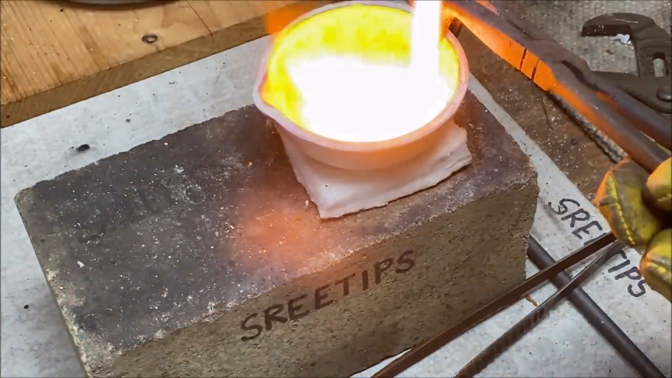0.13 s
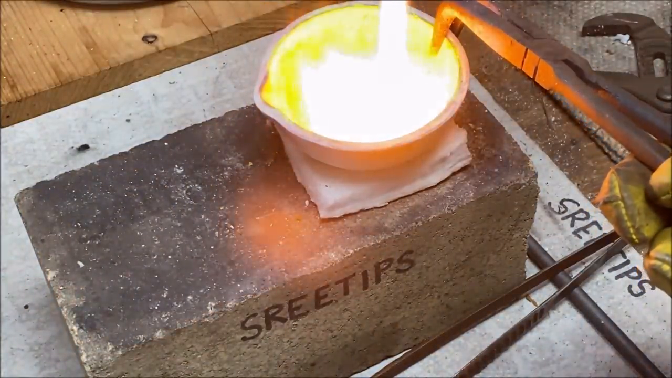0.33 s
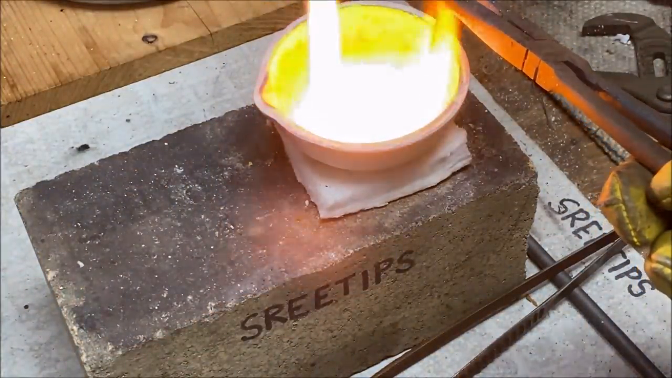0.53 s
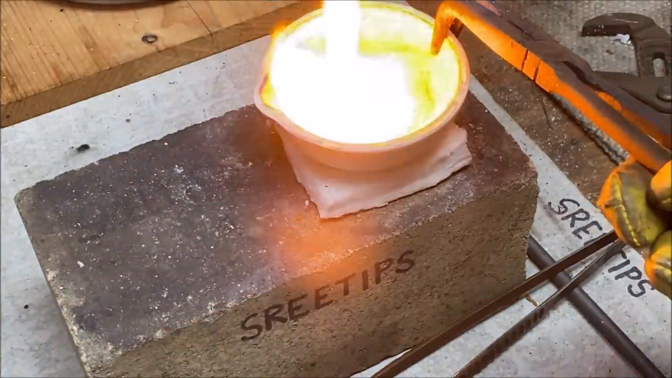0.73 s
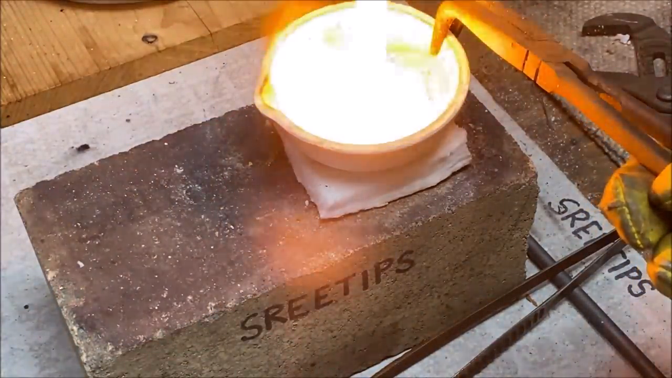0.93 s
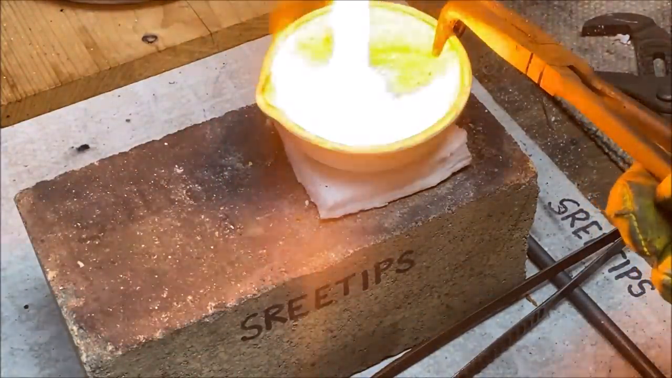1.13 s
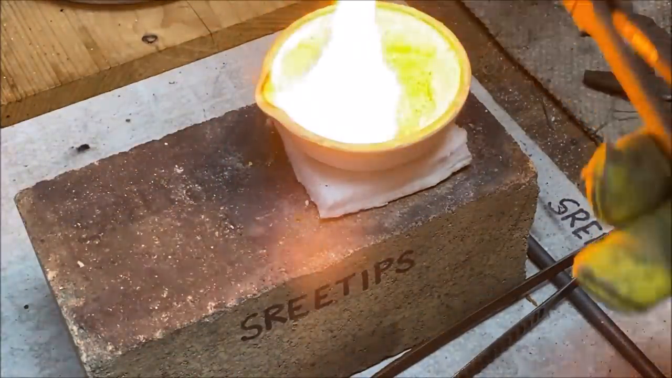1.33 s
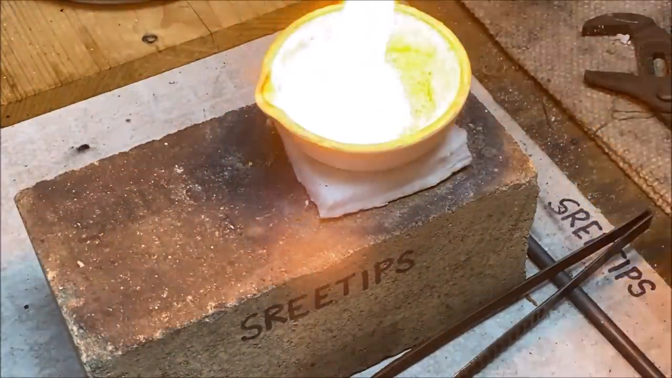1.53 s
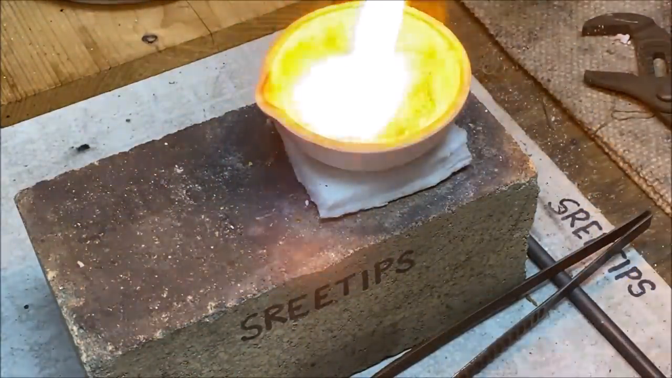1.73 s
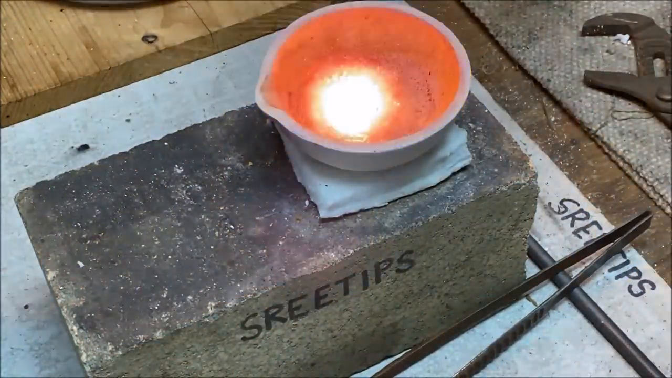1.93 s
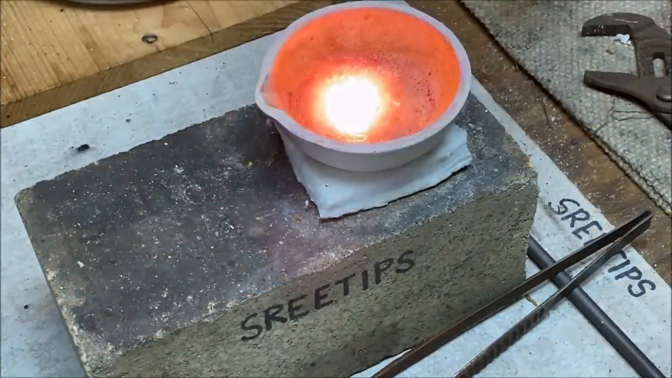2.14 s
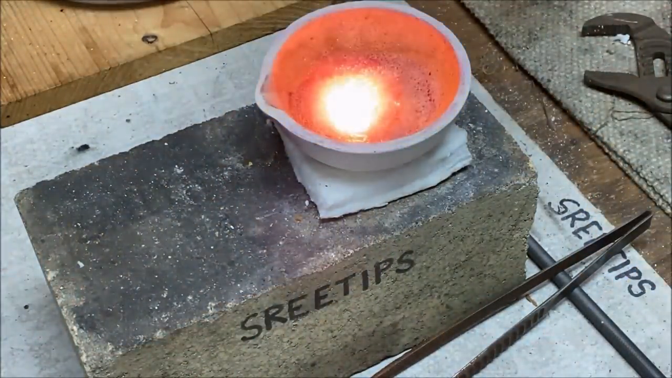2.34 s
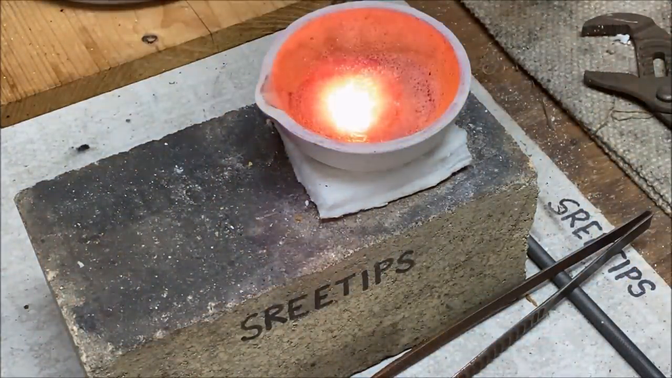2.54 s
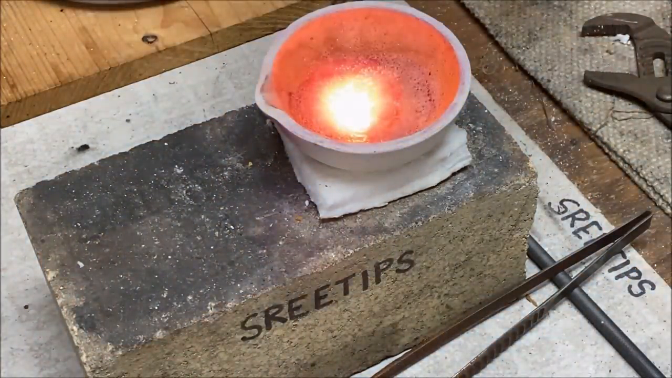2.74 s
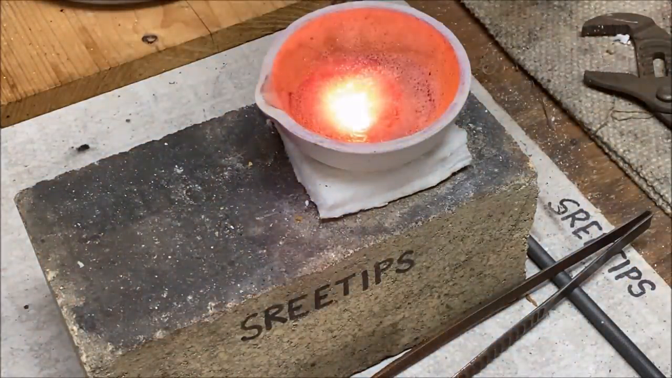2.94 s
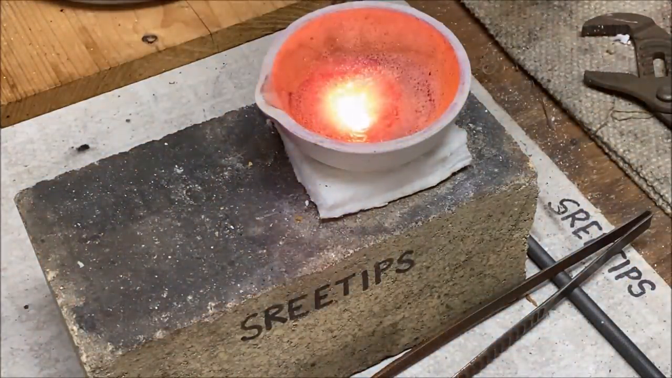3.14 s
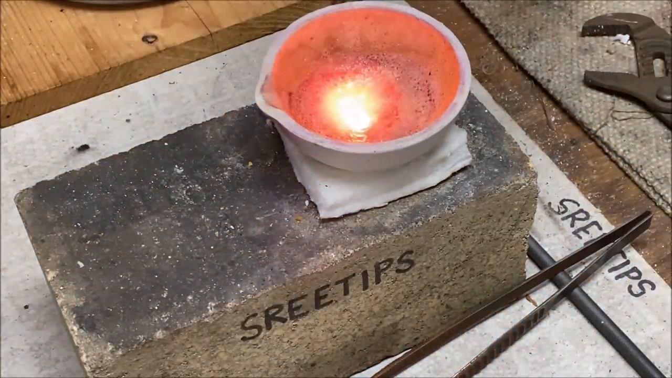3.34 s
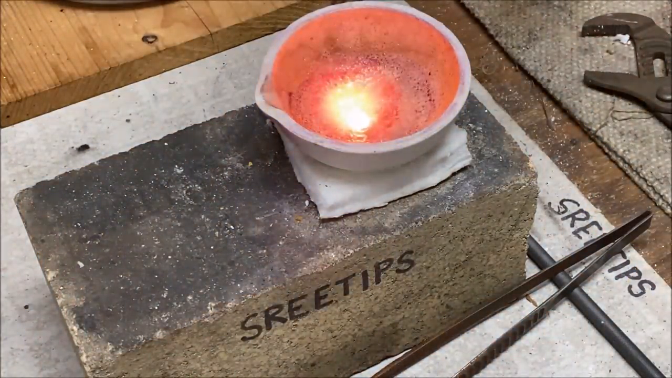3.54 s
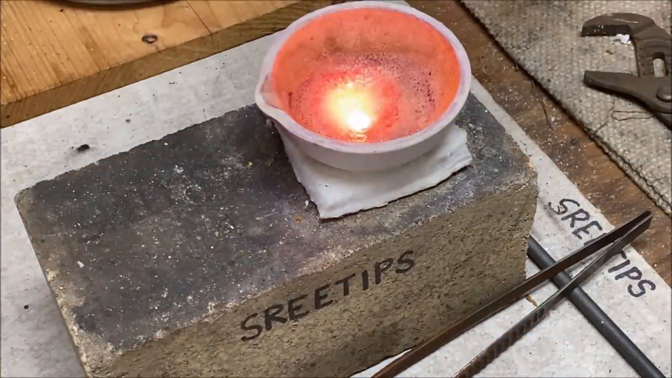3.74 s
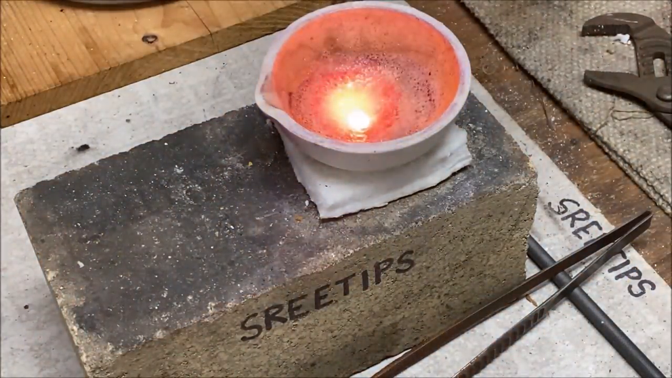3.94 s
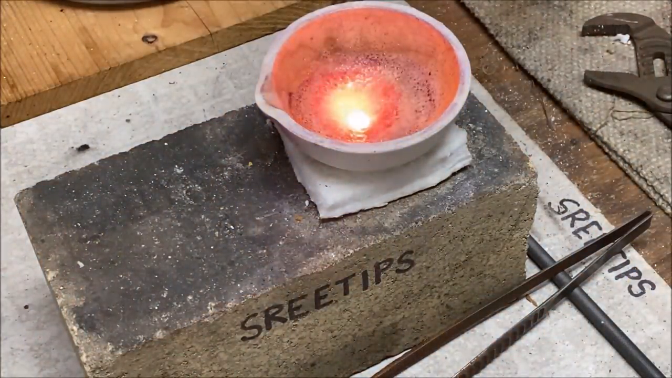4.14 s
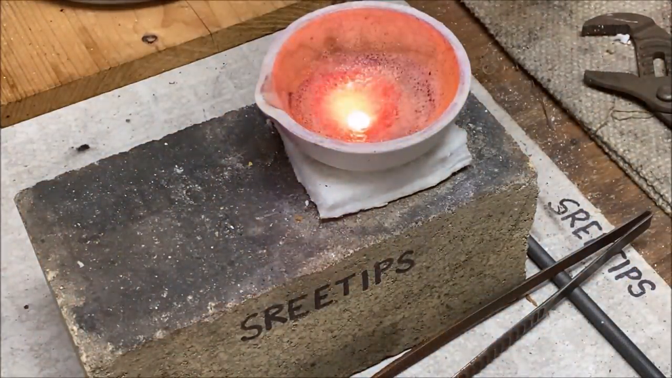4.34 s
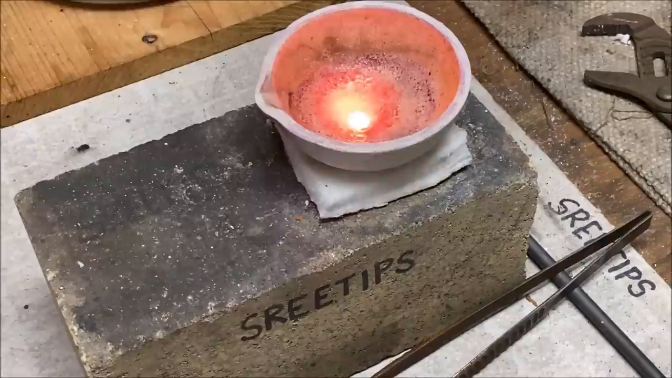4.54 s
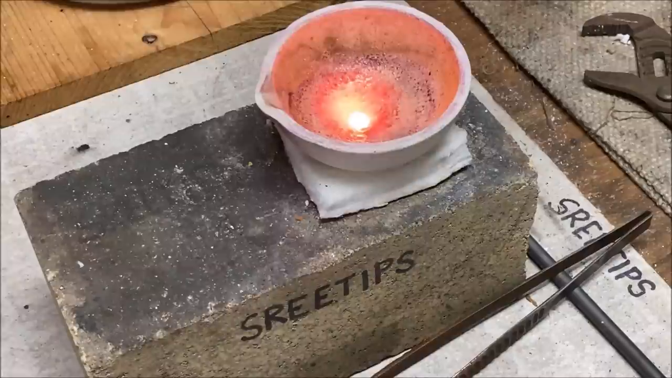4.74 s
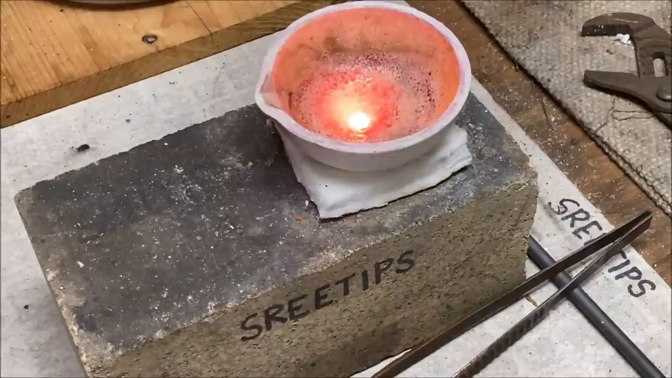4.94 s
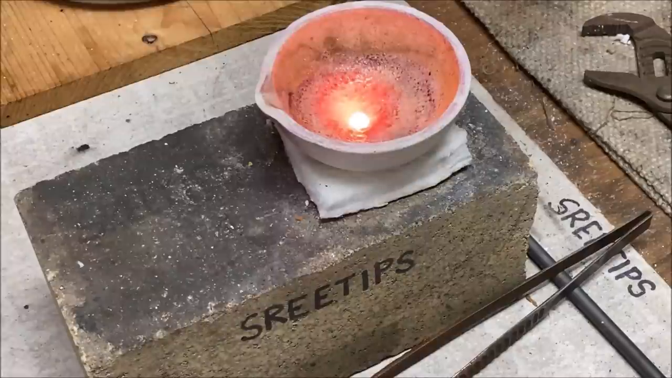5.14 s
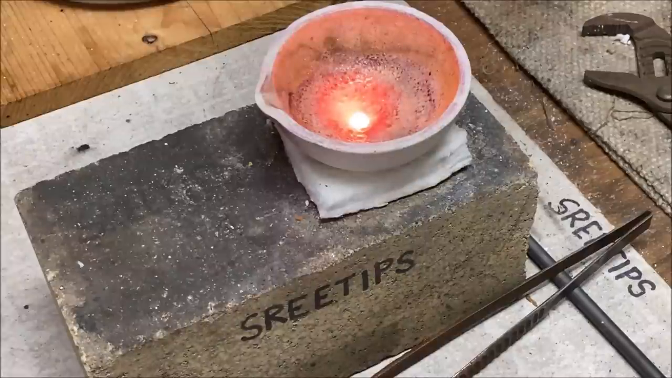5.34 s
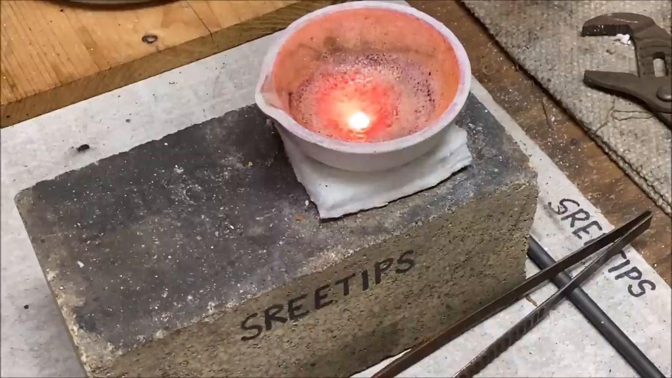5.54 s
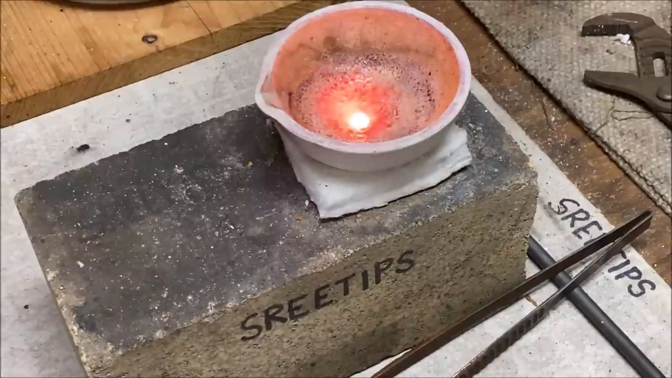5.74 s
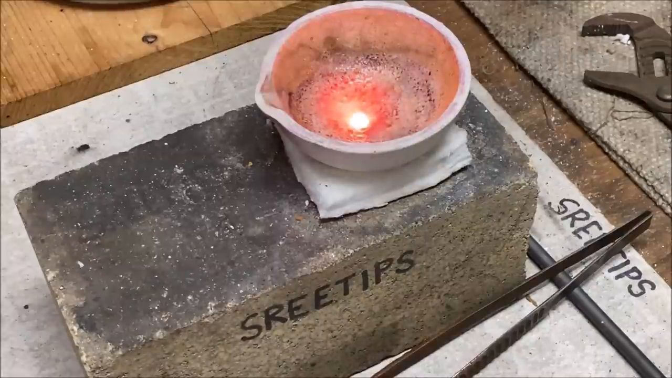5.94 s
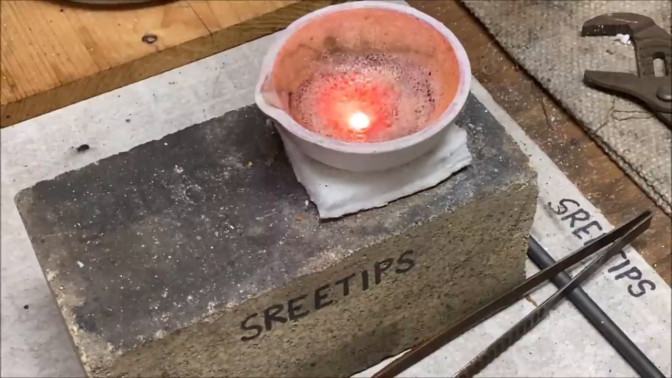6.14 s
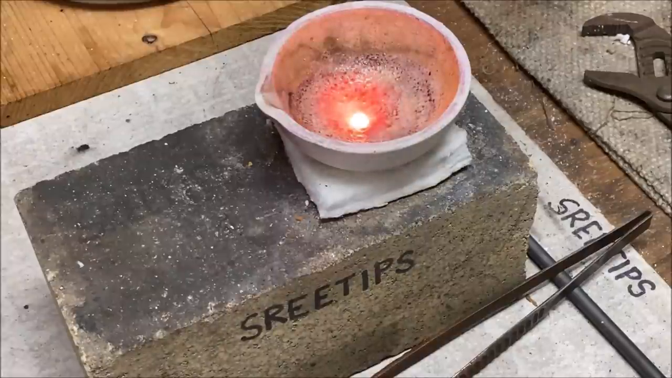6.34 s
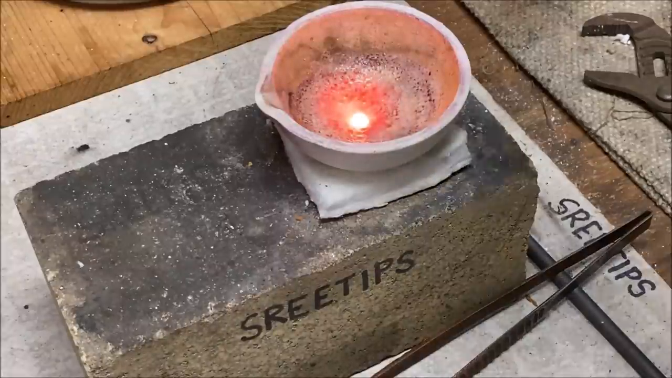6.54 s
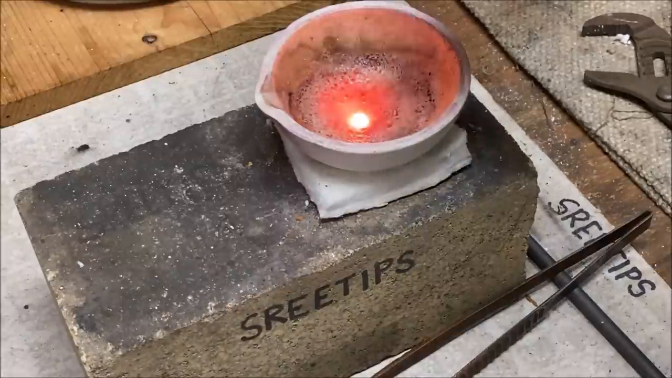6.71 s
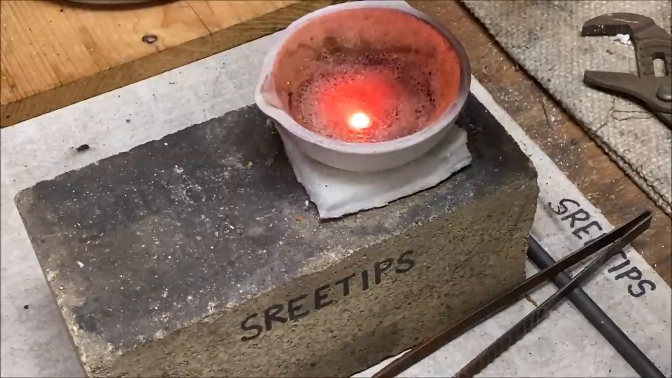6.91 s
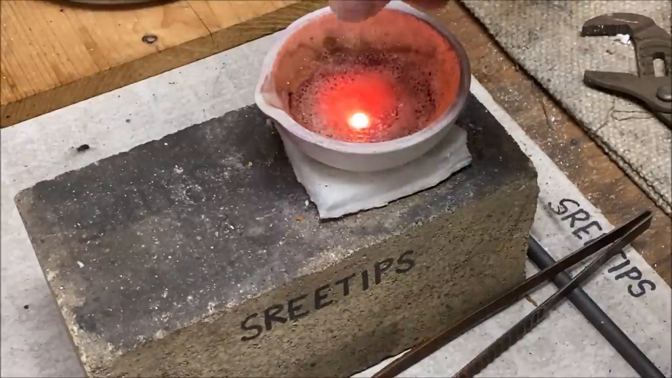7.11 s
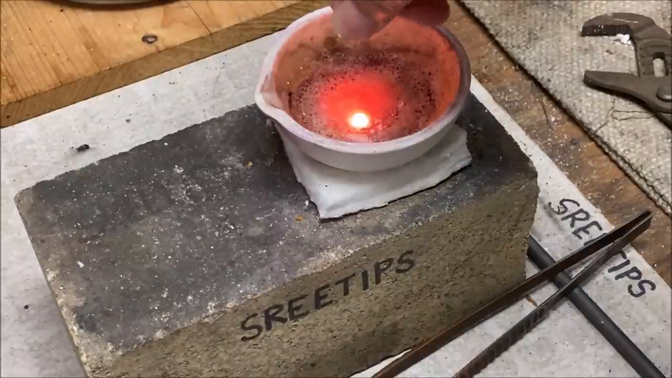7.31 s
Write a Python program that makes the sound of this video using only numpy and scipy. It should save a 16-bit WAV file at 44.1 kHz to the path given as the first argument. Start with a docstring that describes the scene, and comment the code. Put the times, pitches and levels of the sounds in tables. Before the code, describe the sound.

Steady workshop fan drone, with a sharp click and bench thud as a faint torch hiss ends, then cloth rustle and microphone bumps.

```python
"""A workshop extractor fan runs throughout: motor whine and hum over moving air and a low room boom.
At first a small torch hisses faintly into a glowing dish. Near 1.6 s it is lifted and its valve squeaks;
a click and a thud on the bench follow, and the flame is out by 2.05 s. While the dish cools, cloth and
hands rustle, tick and bump close to the hand-held microphone, whose moves shift the whine's level."""
import sys
import numpy as np
from scipy import signal
from scipy.fft import rfft, irfft
from scipy.io import wavfile

SR = 44100
rng = np.random.default_rng(int(sys.argv[2]) if len(sys.argv) > 2 else 0)


def file_out(sig):
    """Save sig as 16-bit WAV at sys.argv[1]."""
    # one column per channel
    cols = np.atleast_2d(sig).T
    # limit, then scale
    lim = np.clip(cols, -1, 1)
    pcm = np.round(lim * 32767).astype(np.int16)
    wavfile.write(sys.argv[1], SR, pcm)


N = 325017

# Fan air spectrum. Each row: frequency in Hz, relative density in dB.
AIR_SPECTRUM = [(15, -32.5), (25, -10), (80, -7.5), (126, -10), (193, -10), (350, -10.5), (540, -16.5),
                (700, -15), (900, -20), (1140, -27.5), (1760, -30), (3300, -50), (8100, -62.5),
                (15900, -81.5)]
# Duct resonances. Each row: centre in Hz, width in Hz, level in dB.
DUCT_MODES = [(249, 8.6, -56), (318, 40, -59.5), (197, 22, -61), (1360, 140, -70)]
# Room boom. Each row: time in seconds, level in dB.
BOOM_LEVEL = [(0.0, -44), (0.18, -58), (0.3, -44.5), (1.0, -51.5), (1.23, -39.5), (1.55, -48.5),
              (1.72, -40.5), (1.95, -45), (2.28, -37), (2.54, -50), (3.5, -41), (3.65, -49), (5.3, -43),
              (6.14, -52.5), (6.27, -42), (6.46, -53.5), (7.28, -38.5), (7.37, -45)]
# Whine at the microphone. Each row: time in seconds, level in dB.
WHINE_LEVEL = [(0.0, -36), (0.5, -41), (0.8, -43), (1.25, -39), (1.6, -41), (1.9, -38), (2.22, -38.5),
               (2.54, -50.5), (2.85, -44), (3.26, -53), (3.37, -39.5), (3.57, -32.5), (3.78, -35),
               (4.06, -33), (4.6, -34.5), (5.05, -33.5), (5.5, -39), (6.5, -35), (7.37, -35)]
# Whine pitch, bent as the microphone moves. Each row: time in seconds, pitch in Hz.
WHINE_PITCH = [(0.0, 619.3), (.5, 619.6), (.7, 618.9), (1.2, 619.6), (1.7, 618.7), (1.9, 619.4),
               (2.3, 618.9), (2.5, 619.6), (2.9, 617.8), (3.3, 619.7), (4.05, 620.1), (4.65, 618.3),
               (5.05, 619.6), (5.4, 617.7), (5.7, 617.9), (6.5, 619.8), (6.8, 619.6), (7.37, 618.2)]
# Steady motor lines. Each row: shaft order, multiple of twice mains.
STEADY_ORDERS = [(0, 1), (0, 2), (0, 3), (0, 4), (-1, 1), (1, 1), (20, 0), (24, 0), (23, 1)]
# Mean level of each steady line in dB.
STEADY_LEVELS_DB = [-48.5, -59.5, -56.5, -64, -57, -54, -69.5, -67.5, -65.5]
# Side lines that shift with the microphone. Each row: shaft order, multiple of twice mains.
SIDE_ORDERS = [(21, 0), (22, 1), (23, 0), (21, 1), (0, 5), (22, 3)]
# Each row: time in seconds, then the level of each side line in dB.
SIDE_LEVELS = [(0.0, -48, -60, -63, -56, -54, -64), (0.75, -48, -66, -63, -56.5, -62, -63.5),
               (1.44, -48, -60.5, -60, -60, -62, -63.5), (1.9, -48, -55, -56, -60, -58, -67),
               (2.3, -50.5, -55.5, -58, -58, -56, -67), (2.9, -52, -57, -55, -59, -62, -73),
               (3.25, -51, -55, -56, -57, -57, -68), (3.5, -51, -50, -56, -61, -54, -65),
               (3.8, -55, -53.5, -60, -61, -55, -66.5), (4.3, -59.5, -50.5, -59, -55.5, -58, -65.5),
               (4.9, -59, -52, -52, -57.5, -54.5, -64), (5.5, -55, -56, -57, -61, -52, -65),
               (6.36, -66, -50, -59, -59.5, -54, -68), (7.37, -62.5, -53.5, -55.5, -62, -54.5, -66)]
# Line one shaft order above the whine. Each row: time in seconds, phase lead in radians.
UPPER_LEAD = [(0, 0), (2.1, 0), (2.6, -1.8), (3.3, -1.6), (3.9, 2.4), (7.37, 2.3)]
# Torch hiss. Each row: centre in Hz, width in Hz, level in dB, change in dB when deep in the dish,
# change in dB when lifted.
FLAME_BANDS = [(4060, 650, -89, 1, 13), (4980, 800, -88, 0, 13), (6770, 500, -88, 0.5, -3),
               (9400, 800, -92, 5, -1), (10000, 250, -89, -7, 2), (11000, 800, -91, -2, -3),
               (11950, 400, -93.5, -5, 0), (12750, 180, -97, -1, 1)]
# Two cloth spectra. Each row: frequency in Hz, relative density in dB.
BRIGHT_SPECTRUM = [(1500, -18), (2500, -4), (4400, -3), (7000, -6), (10700, -14), (15900, -28.5)]
DULL_SPECTRUM = [(500, -5), (1000, -2), (1700, -6), (3000, -15), (4700, -23.5)]
# Cloth and hand rustle as overlapping swells; the rows at 3.39 s and 3.5 s make one continuous rustle. Each
# row: start in seconds, length in seconds, bright level in dB, dull level in dB.
CLOTH_SWELLS = [(1.6, 0.73, -72.5, -62.5), (1.84, 0.14, -69, -51), (1.98, 0.22, -64.5, -57),
                (2.14, 0.19, -67.5, -66), (2.33, 0.081, -77, -64), (2.54, 0.044, -73, -58),
                (2.74, 0.28, -74, -65), (2.93, 0.3, -69, -60), (3.14, 0.073, -79, -54),
                (3.21, 0.25, -73.5, -74), (3.39, 0.09, -62.5, -54.5), (3.5, 0.14, -63, -60),
                (3.64, 0.17, -69, -81), (3.88, 0.14, -72.5, -65), (4.07, 0.049, -78.5, -70),
                (4.48, 0.1, -72, -68.5), (4.675, 0.13, -84, -55.5), (4.71, 0.058, -63.5, -62),
                (4.79, 0.14, -64, -49.5), (4.93, 0.35, -66, -60.5), (5.32, 0.3, -72, -67.5),
                (5.6, 0.19, -72, -63), (5.79, 0.15, -72, -61.5), (5.93, 0.3, -76.5, -63.5),
                (6.225, 0.1, -68, -62), (6.3, 0.22, -69.5, -64)]
# Microphone jostles. Each row: start in seconds, length in seconds, level in dB.
JOSTLES = [(1.36, 0.11, -37), (1.78, 0.1, -45), (2.05, 0.16, -35), (2.34, 0.081, -35.5), (2.75, 0.37, -39),
           (3.14, 0.78, -35.5), (3.74, 0.061, -33.5), (3.93, 0.11, -37), (4.07, 0.076, -38.5),
           (4.45, 0.17, -39), (4.68, 0.43, -31), (5.17, 0.16, -35.5), (5.37, 0.2, -39.5),
           (5.55, 0.42, -41.5), (6.3, 0.28, -44)]
# Dry ticks. Each row: start in seconds, level in dB, pitch in Hz, T60 in seconds.
TICKS = [(1.828, -27, 1500, 0.0036), (1.851, -13.5, 5440, 0.0018), (1.8535, -28, 4930, 0.0026),
         (1.856, -42, 3460, 0.028), (1.864, -47.5, 4800, 0.05), (2.539, -54, 7050, .006),
         (2.545, -56, 8400, 0.054), (2.556, -41, 2300, 0.008), (2.557, -53, 9000, 0.0073),
         (2.687, -53, 6000, .006), (3.154, -36, 2000, .002), (3.197, -44.5, 4500, 0.0097),
         (3.202, -45, 4500, 0.032), (3.297, -28, 3500, 0.0011), (3.352, -50, 3980, 0.032),
         (3.406, -28, 4000, 0.0013), (4.063, -26, 2300, 0.0024), (4.064, -39.5, 5940, 0.002),
         (4.668, -49.5, 2600, 0.068), (5.223, -31, 2980, 0.0034), (5.609, -36, 3500, 0.0024)]
# Microphone knocks. Each row: start in seconds, level in dB, pitch in Hz, 1 for push or -1 for pull.
KNOCKS = [(2.093, -21, 60, 1), (2.409, -20.5, 16, 1), (2.50, -23, 9.1, 1), (3.146, -31.5, 250, 1),
          (3.17, -29, 140, -1), (3.196, -31, 240, -1), (3.186, -25, 39, 1), (3.345, -21, 8.8, 1),
          (3.512, -19.5, 50, -1), (3.541, -21, 39, 1), (3.58, -21.5, 22, -1), (4.07, -24, 98, 1),
          (4.755, -22, 90, 1), (4.761, -20, 68, -1), (4.77, -16, 100, -1), (4.786, -19.5, 42, -1),
          (4.803, -24, 7.2, 1), (4.85, -26, 17, -1), (5.01, -22.5, 38, -1), (5.222, -34, 19, -1)]
# Crackle runs. Each row: start in seconds, length in seconds, level in dB.
CRACKLES = [(3.927, .07, -44), (4.073, 0.048, -47)]
# Blows on the bench. Each row: time in seconds, strength in dB, contact cut-off in Hz.
BLOWS = [(1.8322, -13.5, 220), (1.8502, -13.5, 3500), (1.8517, -11.5, 350), (1.861, -17.5, 500),
         (1.875, -20, 1800), (1.885, -17, 1800), (1.9049, -24, 1800), (1.925, -25, 900)]
# Bench modes. Each row: frequency in Hz, relative level in dB, T60 in seconds.
BENCH_MODES = [(152.5, 1, 0.077), (215.1, -4.5, 0.2), (273.6, -0.5, 0.23), (358, 1, 0.066),
               (470, -3.5, 0.062), (530, -10, 0.11), (656, -2, 0.024), (870, -12, 0.047), (1040, -10, 0.03),
               (1180, -10.5, 0.04), (1377, -8, 0.031), (1780, -11.5, 0.03), (2250, -21, 0.042),
               (2860, -18, 0.032)]

FLAME_OFF_S = 2.05
TIME_S = np.arange(N) / SR


def amp(db):
    """dB to gain."""
    return 10 ** (np.asarray(db) / 20)


def unit_rms(x):
    """Scale to rms 1."""
    return x / np.sqrt(np.mean(x ** 2) + 1e-20)


def curves(rows):
    """One per-sample curve for each column after the time."""
    times_s, *columns = np.transpose(rows)
    return [np.interp(TIME_S, times_s, column) for column in columns]


def drift(rate_hz):
    """Slow random wander, rms 1."""
    hop, settle = 40, 2000
    pole = np.exp(-2 * np.pi * hop * rate_hz / SR)
    noise = rng.standard_normal(N // hop + settle + 2)
    slow = signal.lfilter([1], [1, -2 * pole, pole * pole], noise)[settle:]
    return np.interp(np.arange(N) / hop, np.arange(len(slow)), unit_rms(slow))


def colour(x, spectrum):
    """Shape x by a spectrum, -90 dB beyond its ends; rms 1."""
    hz, level_db = np.transpose(spectrum)
    grid_hz = np.fft.rfftfreq(N, 1 / SR) + 1
    gain = amp(np.interp(np.log(grid_hz), np.log(hz), level_db, -90, -90))
    return unit_rms(irfft(rfft(x) * gain, N))


def resonant_noise(hz, width_hz):
    """Noise twice through one resonance; rms 1."""
    radius = np.exp(-np.pi * width_hz / SR)
    poles = [1, -2 * radius * np.cos(2 * np.pi * hz / SR), radius ** 2]
    once = signal.lfilter([1, 0, -1], poles, rng.standard_normal(N + SR))
    return unit_rms(signal.lfilter([1, 0, -1], poles, once)[SR:])


def ring(clicks, hz, t60_s):
    """One mode: each click starts a decaying sine."""
    radius, step_rad = amp(-60 / (t60_s * SR)), 2 * np.pi * hz / SR
    poles = [1, -2 * radius * np.cos(step_rad), radius ** 2]
    return signal.lfilter([0, np.sin(step_rad)], poles, clicks + 1e-18)


def add(out, start_s, piece):
    """Mix a short sound into out."""
    i = round(start_s * SR)
    out[i:i + len(piece)] += piece[:N - i]


def swell_power(rows, rise_share=.45, fall_share=.7):
    """Power curve per level column; ramps are centred on each row's start and end."""
    power = 0
    for start_s, length_s, *levels_db in rows:
        rise = (TIME_S - start_s) / (rise_share * length_s)
        fall = (start_s + length_s - TIME_S) / (fall_share * length_s)
        swell = np.clip(.5 + np.minimum(rise, fall), 0, 1)
        power += np.outer(amp(levels_db), swell) ** 2
    return power


def room(x, t60_s=1):
    """Dense decaying reflections, from 6 ms on."""
    t = np.arange(round(t60_s * SR)) / SR
    tail = rng.standard_normal(len(t)) * amp(-60 * t / t60_s) * (t > .006)
    return signal.fftconvolve(x, tail / np.sqrt(np.sum(tail ** 2)))[:N]


def electronic_whine(base_hz=400, first_db=-98, fall_db=.55):
    """Faint steady treble lines at multiples of one base."""
    multiples = [11, 14, 17, 19, 22, 24, 25, 27, 29, 32, 34, 35, 37]
    base_rad = 2 * np.pi * base_hz * TIME_S
    return sum(np.sqrt(2) * amp(first_db - fall_db * (k - multiples[0])) * np.sin(k * base_rad + k * k)
               for k in multiples)


def fan_air(rush_db=-48.5):
    """Smooth rush of air plus duct resonances."""
    rush = amp(rush_db + .8 * drift(3)) * colour(rng.standard_normal(N), AIR_SPECTRUM)
    duct = sum(amp(level_db) * resonant_noise(hz, width_hz) for hz, width_hz, level_db in DUCT_MODES)
    return rush + duct


def room_boom(hz=48.3, waver_hz=1.5):
    """Air rocking in the room's lowest mode: a tone of wavering pitch."""
    phase_rad = 2 * np.pi * np.cumsum(hz + waver_hz * drift(3.2)) / SR
    return np.sqrt(2) * amp(curves(BOOM_LEVEL)[0]) * np.sin(phase_rad)


def fan_motor(rotor_slots=22, mains_hz=60):
    """Rotor slots whine, the field hums at twice mains; field and shaft split off side lines."""
    shaft_rad = 2 * np.pi * np.cumsum(curves(WHINE_PITCH)[0]) / rotor_slots / SR
    field_rad = 2 * np.pi * 2 * mains_hz * TIME_S
    lines = [((rotor_slots, 0), curves(WHINE_LEVEL)[0])]
    lines += zip(SIDE_ORDERS, curves(SIDE_LEVELS))
    lines += [(orders, db + 2.2 * drift(1.2)) for orders, db in zip(STEADY_ORDERS, STEADY_LEVELS_DB)]
    offsets_rad = list(rng.uniform(0, 2 * np.pi, len(lines)))
    # The lines one shaft order either side throb the whine's level at zero lead, later bend its pitch.
    whine, lower, upper = 0, 1, 3
    offsets_rad[upper] = 2 * offsets_rad[whine] - offsets_rad[lower] + curves(UPPER_LEAD)[0]
    return sum(np.sqrt(2) * amp(db) * np.sin(order * shaft_rad + multiple * field_rad + offset_rad)
               for ((order, multiple), db), offset_rad in zip(lines, offsets_rad))


def torch_flame(deep_from_s=.66, deep_until_s=1.1, lift_s=1.55, waver_db=2.5):
    """Wavering bands of jet hiss; some swell as the torch lifts, all die once the valve is shut."""
    burning = np.clip((FLAME_OFF_S - TIME_S) / .12, 0, 1)
    lifted = np.clip((TIME_S - lift_s) / .031, 0, 1)
    deep = np.clip(np.minimum(TIME_S - deep_from_s, deep_until_s - TIME_S) / .08, 0, 1)
    hiss = np.zeros(N)
    for hz, width_hz, level_db, deep_db, lift_db in FLAME_BANDS:
        band_db = level_db + deep_db * deep + lift_db * lifted + waver_db * drift(3)
        hiss += amp(band_db) * resonant_noise(hz, width_hz)
    return burning * hiss


def rustle(spectrum, snaps_per_s, snaps_db):
    """Fibres slipping: noise with scattered small snaps."""
    sizes = amp(4.5 * np.minimum(rng.exponential(1, N), 3)) * rng.standard_normal(N)
    snaps = sizes * (rng.random(N) < snaps_per_s / SR)
    return colour(rng.standard_normal(N) + amp(snaps_db) * unit_rms(snaps), spectrum)


def cloth(bright_floor_db=-77.5, dull_floor_db=-63, torch_hiss_db=-83):
    """Bright and dull rustle rise and fall in overlapping swells; extra bright hiss while the torch burns."""
    bright_power, dull_power = swell_power(CLOTH_SWELLS)
    bright_power += amp(bright_floor_db) ** 2 + (TIME_S < FLAME_OFF_S) * amp(torch_hiss_db) ** 2
    dull_power += amp(dull_floor_db) ** 2
    bright = amp(1.3 * drift(9)) * rustle(BRIGHT_SPECTRUM, snaps_per_s=900, snaps_db=-10)
    dull = amp(1.5 * drift(25)) * rustle(DULL_SPECTRUM, snaps_per_s=500, snaps_db=-9)
    return np.sqrt(bright_power) * bright + np.sqrt(dull_power) * dull


def mic_jostle(held_db=-63):
    """Lumpy rumble of the held microphone, swelling when it is jostled."""
    spectrum_hz_db = [(5, -3), (12, 2.5), (30, -12.5), (60, -20), (150, -21), (300, -35.5)]
    rumble = colour(rng.standard_normal(N), spectrum_hz_db)
    power = swell_power(JOSTLES)[0] + amp(held_db) ** 2
    return np.sqrt(power) * amp(1.7 * drift(26)) * rumble


def mic_knocks():
    """Knocks on the microphone body: push and rebound, about two cycles."""
    out = np.zeros(N)
    t = np.arange(SR // 2) / SR
    for start_s, level_db, hz, direction in KNOCKS:
        rebound = np.exp(-hz * t / .55) * np.sin(2 * np.pi * hz * t)
        add(out, start_s, direction * amp(level_db) * rebound)
    return out


def tick(hz, t60_s, scratch_share, cutoff_hz=9800):
    """Short ring with a rounded onset, mixed with scratchy noise about an octave wide."""
    t = np.arange(SR // 5) / SR
    band = signal.butter(2, [hz / 1.5, min(hz * 1.5, .45 * SR)], "band", fs=SR, output="sos")
    noise = unit_rms(signal.sosfilt(band, rng.standard_normal(len(t))))
    onset = np.sin(np.pi / 2 * np.minimum(t * hz / 1.5, 1)) ** 2
    body = (1 - scratch_share) * np.sin(2 * np.pi * hz * t) + .6 * scratch_share * noise
    lowpass = signal.butter(6, cutoff_hz, fs=SR, output="sos")
    return signal.sosfilt(lowpass, onset * amp(-60 * t / t60_s) * body)


def handling_ticks(all_scratch_s=.008):
    """The shut-off click and dry handling ticks; longer ones scratch more."""
    out = np.zeros(N)
    for start_s, level_db, hz, t60_s in TICKS:
        add(out, start_s, amp(level_db) * tick(hz, t60_s, min(t60_s / all_scratch_s, 1)))
    return out


def crackle(gap_s=.01, nominal_hz=6100, max_ticks=12):
    """Runs of fine ticks, uneven in time, size and pitch."""
    out = np.zeros(N)
    for start_s, length_s, level_db in CRACKLES:
        late, softness, pitch = rng.random((max_ticks, 3)).T
        for k in np.flatnonzero(np.arange(max_ticks) * gap_s < length_s):
            snap = tick(nominal_hz * (.8 + .5 * pitch[k]), t60_s=.003, scratch_share=.5)
            add(out, start_s + (k + late[k]) * gap_s, amp(level_db - 8 * softness[k]) * snap)
    return out


def valve_squeak(start_s=1.575, length_s=.051, level_db=-51, start_hz=880, glide_hz_per_s=3500):
    """The valve turns with a short rising squeak."""
    t = TIME_S - start_s
    tone = np.sin(2 * np.pi * (start_hz * t + glide_hz_per_s * t ** 2 / 2)) * amp(2.5 * drift(45))
    return np.sqrt(swell_power([(start_s, length_s, level_db)])[0]) * tone


def scrape(start_s=4.805, length_s=.08, level_db=-52.5):
    """A brief rub: rough noise in one wide resonance."""
    noise = resonant_noise(hz=1800, width_hz=1200) * amp(3.5 * drift(90))
    return np.sqrt(swell_power([(start_s, length_s, level_db)])[0]) * noise


def bench_thud(trim_db=-8.5):
    """Each blow strikes every bench mode; a soft contact leaves the high ones quiet."""
    times_s, strength_db, contact_hz = np.transpose(BLOWS)
    scatter_db = rng.normal(0, 1.5, (len(BLOWS), len(BENCH_MODES)))
    out = np.zeros(N)
    for k, (hz, level_db, t60_s) in enumerate(BENCH_MODES):
        drive = amp(strength_db + level_db + trim_db + scatter_db[:, k])
        clicks = np.zeros(N)
        clicks[(times_s * SR).astype(int)] = drive / (1 + (hz / contact_hz) ** 2)
        polarity = -(-1) ** max(k, 1)  # lowest pair in phase, the rest alternate
        out += polarity * ring(clicks, hz, t60_s)
    return signal.sosfilt(signal.butter(3, [115, 5500], "band", fs=SR, output="sos"), out)


def scene(room_db=-6):
    """Mono mix; only the thud reverberates."""
    thud = bench_thud()
    background = fan_motor() + fan_air() + room_boom() + electronic_whine()
    flame = torch_flame()
    handling = cloth() + mic_jostle() + mic_knocks()
    handling += handling_ticks() + crackle() + valve_squeak() + scrape()
    return (background + flame + handling + thud + amp(room_db) * room(thud))[None]


def record(dry, hiss_db=-88, cutoff_hz=15700):
    """Microphone hiss, then a steep low-pass."""
    hiss = amp(hiss_db) * rng.standard_normal(dry.shape)
    return signal.sosfilt(signal.ellip(12, .5, 60, cutoff_hz, fs=SR, output="sos"), dry + hiss)


dry = scene()
out = record(dry)
file_out(out)
```